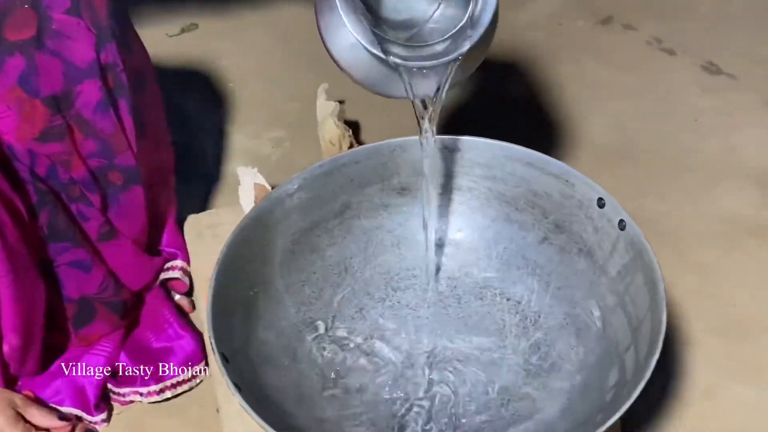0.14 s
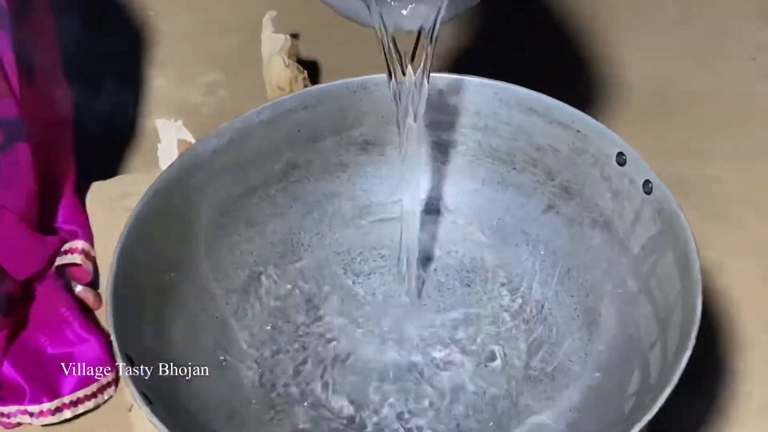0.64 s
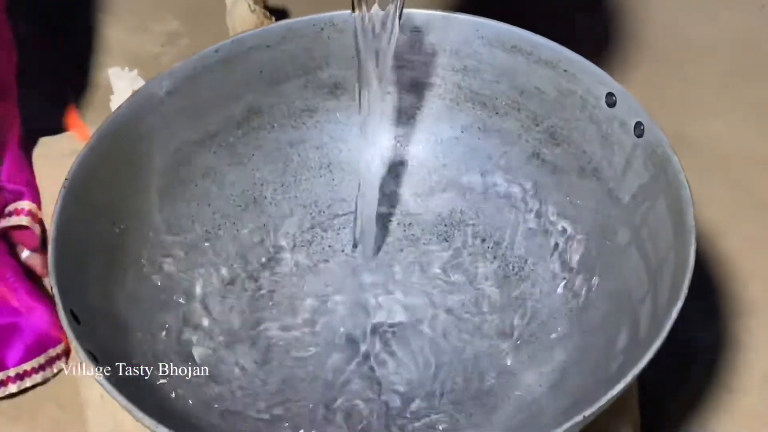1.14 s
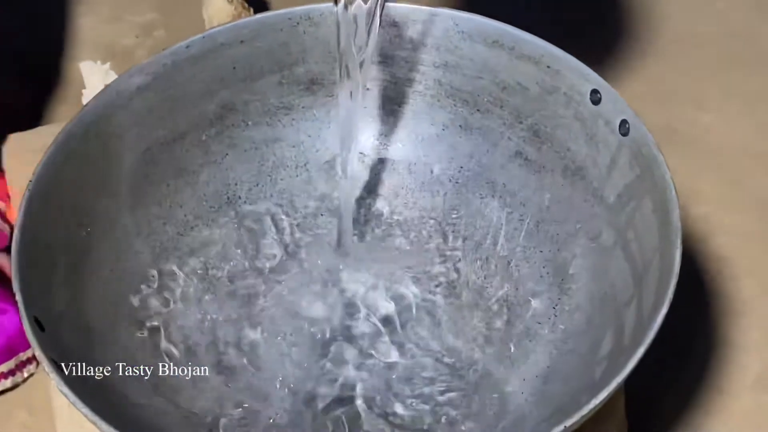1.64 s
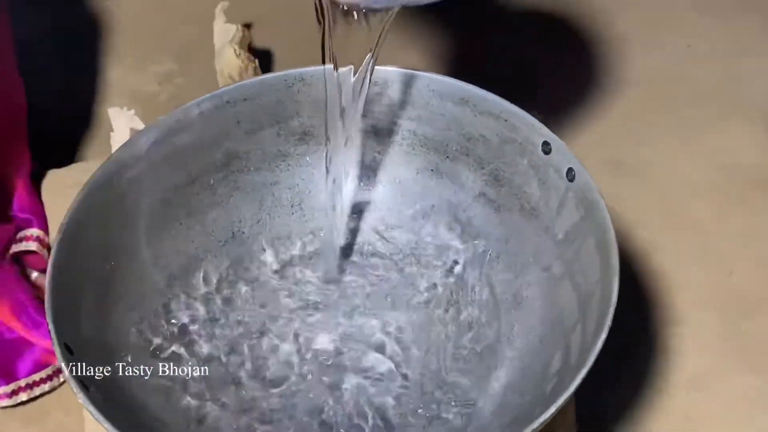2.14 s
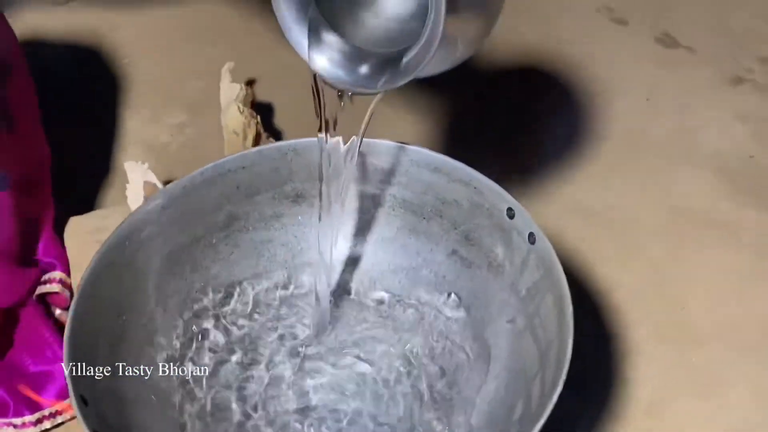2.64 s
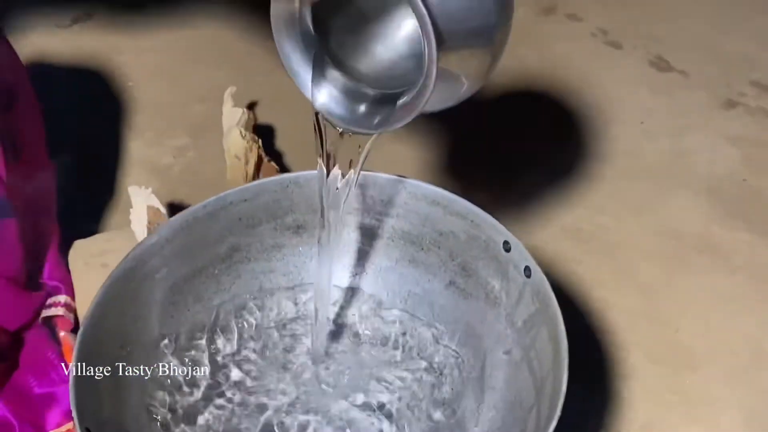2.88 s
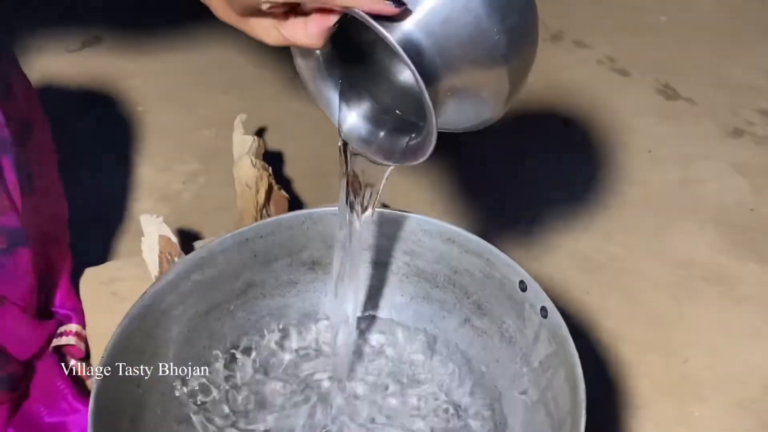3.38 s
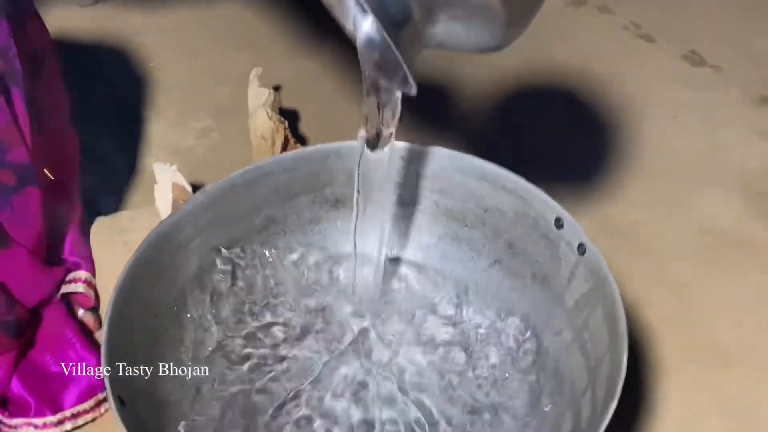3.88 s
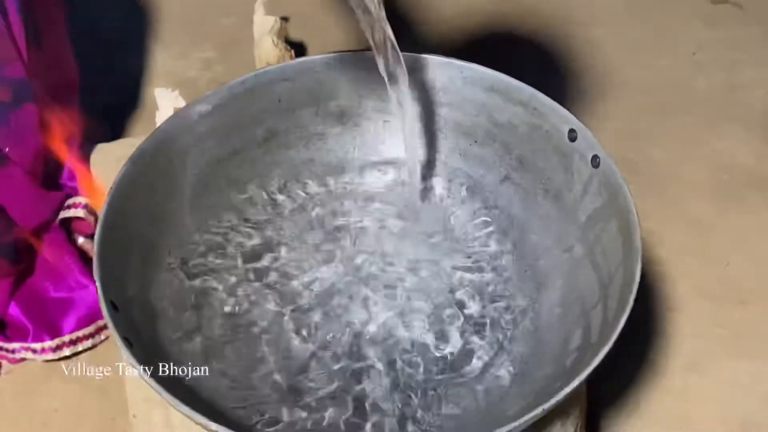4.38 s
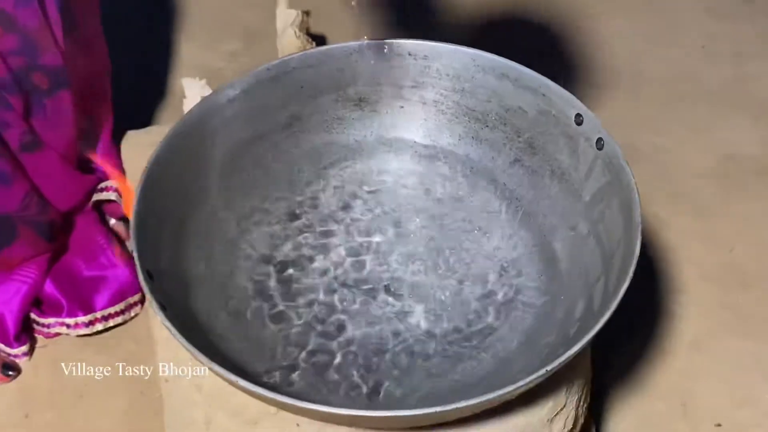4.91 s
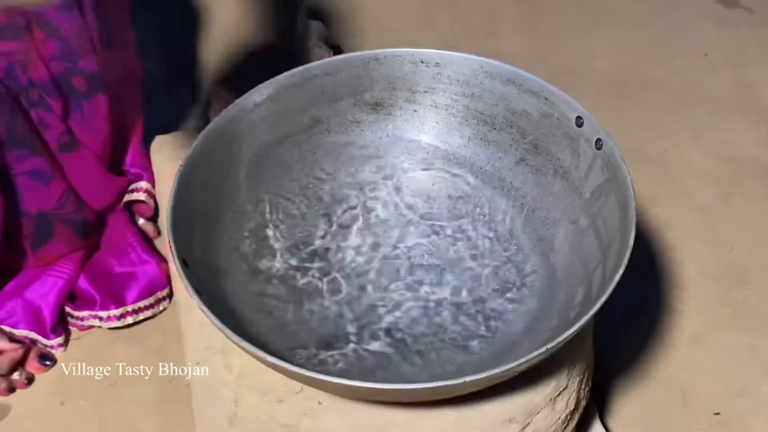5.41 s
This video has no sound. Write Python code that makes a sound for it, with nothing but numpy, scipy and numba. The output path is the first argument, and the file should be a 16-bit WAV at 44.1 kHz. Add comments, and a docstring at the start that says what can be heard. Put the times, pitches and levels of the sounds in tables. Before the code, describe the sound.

From the start, a thin stream of water is already falling into a wide metal pan, heard close with a phone-like stereo sound. It is a dense crowd of tiny bubbles: mid-pitched gurgle, finer bright fizz and ticking spray, touched by a brief metallic ring. Sharp plinks are frequent in the first second, some very high at 0.6-0.8 s, with rounder glugs sliding upward among them. From 1 to 1.6 s the flow is fuller and smoother; from about 1.7 to 3 s the spray eases and plinks are sparser. Bright plinks return from 3 s, with a fuller surge near 3.6 s. After 4 s the gurgle deepens, lowest near 4.9 s, amid a cluster of plinks and glugs. The pour stops around 5.1 s with a rising bloop, then two faint drips at 5.2 and 5.4 s. A soft fire rumble, faint airy hiss and distant, slowing engine hum remain throughout.

```python
"""A thin stream of water gurgles, plinks and fizzes as it falls from a small metal pot into a wide metal pan.
Every water sound is a crowd of bubbles: short tones that swell, slide up in pitch and die away.
Spray ticks over the stream, the pan rings on briefly, and a few clean drips end the pour.
Behind it, shaped noise makes the soft rumble of a fire, and low sine tones the hum of a far engine.
It is heard close by, as a phone would hear it, in two channels."""
import sys
import numpy as np
from scipy import signal
from scipy.fft import rfft, irfft, next_fast_len
from scipy.io import wavfile
from scipy.ndimage import uniform_filter1d
from numba import njit

SR = 44100
rng = np.random.default_rng(int(sys.argv[2]) if len(sys.argv) > 2 else 0)


def ratio(d):
    """dB to gain"""
    e = np.asarray(d, float) / 20
    return 10 ** e


def int16_out(signal):
    """Quantize to a 16-bit WAV file."""
    q = np.round(np.clip(np.atleast_2d(signal).T, -1, 1) * 32767)
    wavfile.write(sys.argv[1], SR, q.astype(np.int16))


N = 243431
TIME = np.arange(N) / SR


def on_log(hz, table):
    """Read a (frequency [Hz], value) table, with frequency on a log scale."""
    table_hz, value = np.transpose(table)
    return np.interp(np.log(np.maximum(hz, 1)), np.log(np.maximum(table_hz, 1)), value)


def shape(x, gain):
    """Filter a sound by a gain that depends on frequency."""
    size = next_fast_len(N + 4096)
    hz = np.arange(size // 2 + 1) * SR / size
    return irfft(rfft(x, size) * gain(hz), size)[..., :N]


def unit(x):
    """Scale to an rms of 1."""
    return x / np.sqrt(np.mean(x ** 2))


def walk(rate):
    """Wander at random: new values `rate` times a second, smoothed twice, with an rms of 1."""
    hold = int(SR / rate)
    steps = np.repeat(rng.standard_normal(N // hold + 1), hold)
    smooth = uniform_filter1d(uniform_filter1d(steps, hold), hold)
    return unit(smooth[:N])


@njit
def ring(n, start, size, hz, end_hz, length, rise, fall, bend):
    """Each bubble swells quickly and dies away while its pitch curls upward; start and length in samples."""
    out = np.zeros(n)
    for k in range(len(start)):
        phase, first = 0., int(start[k])
        for i in range(min(int(3 * length[k]) + 2, n - first)):
            u = i / length[k]
            pitch = hz[k] * (end_hz[k] / hz[k]) ** min(u, 1.0) ** bend
            phase += 2 * np.pi * pitch / SR
            swell = 1 - np.exp(-u / rise)
            decay = np.exp(-fall * u * u - u ** 6)
            out[first + i] += size[k] * swell * decay * np.sin(phase)
    return out


def swarm(count, pitch, cycles, scatter_db, glide, rise, clump_db):
    """Bubbles at random moments, most faint and a few loud, louder in clumps; rms 1.

    pitch(seconds, chance) gives each bubble's Hz and dB."""
    when, which, luck, ringing, slide = rng.random((count, 5)).T
    s = when * N / SR
    hz, db = pitch(s, which)
    db = db - scatter_db * np.log(1.02 - luck) + clump_db[(s * SR).astype(int)]
    length = cycles * (0.24 + 1.45 * ringing) * SR / hz
    return unit(ring(N, s * SR, ratio(db), hz, hz * (1 + glide * slide), length, rise, 1.0, 1.48))


def spread(table):
    """Make a pitch rule that spreads bubbles evenly in octaves over a table, with its levels."""
    def pitch(s, chance):
        low, high = table[0][0], table[-1][0]
        hz = low * (high / low) ** chance
        return hz, on_log(hz, table)
    return pitch


# tone of the fire and the open air, before scaling: (frequency [Hz], level per Hz [dB])
AIR_TONE = [(20, -38), (45, 3), (100, 3.5), (190, -5.5), (235, -14), (330, -16), (420, -18.5), (1000, -25),
            (2000, -30), (5000, -24.5), (10000, -28.5), (16000, -24.5)]


def air():
    """Low flutter of the fire over a faint open-air hiss: shaped noise that wavers in level."""
    noise = unit(shape(rng.standard_normal(N), lambda hz: ratio(on_log(hz, AIR_TONE))))
    return noise * ratio(-54 + walk(21))


# a distant engine slowing down: (time [s], firing rate [Hz], loudest multiple of that rate [number])
ENGINE_SPEED = [(0, 25, 6.9), (2.1, 24.95, 6.9), (2.9, 24.35, 6.2), (4.5, 24.05, 6.3), (4.6, 23.45, 8.4),
                (5.52, 23.1, 8.4)]


def engine():
    """Multiples of the firing rate, each wavering in level; distance leaves only the low ones."""
    s, hz, loudest = np.transpose(ENGINE_SPEED)
    turn = 2 * np.pi * np.cumsum(np.interp(TIME, s, hz)) / SR
    loudest_now = np.interp(TIME, s, loudest)
    hum = np.zeros(N)
    for k in range(4, 10):
        # 6 dB weaker for each multiple away from the loudest
        db = -58 - 6 * np.abs(k - loudest_now) + 2.34 * walk(3.05)
        hum += ratio(db) * np.sin(k * turn + 2 * np.pi * rng.random())
    return hum


def nearby(x, t60_s, db):
    """Two scatters of very short reflections off the pan wall, shifting as the surface moves."""
    out = np.zeros((2, N))
    lags_s = np.sort(rng.uniform(0.00098, .012, 10))
    for scatter, lag_s in zip(np.arange(10) % 2, lags_s):
        lag = SR * (lag_s + 0.000189 * walk(8))  # samples
        fade = np.exp(-np.log(1000) * lag_s / t60_s)
        out[scatter] += fade * np.interp(np.arange(N) - lag, np.arange(N), x)
    return ratio(db) * out


# what the pan favours: (frequency [Hz], width [Hz], boost [dB])
PAN_RESONANCES = [(1500, 360, 6.5), (3294, 126, 5), (3560, 73, 3), (7000, 590, 4)]


def pan(x):
    """The pan rings on briefly near its own resonances."""
    def gain(f):
        peaks = [1 + (ratio(db) - 1) / (1 + 2j * (f - hz) / width) for hz, width, db in PAN_RESONANCES]
        return np.prod(peaks, axis=0)
    return shape(x, gain)


# last drops into calm water:
# (time [s], level [dB], starting pitch [Hz], climb [octaves], ring length [ms])
LAST_DRIPS = [(5.084, -36, 750, 2.16, 51.4), (5.234, -50.5, 1700, .02, 19), (5.41, -56.5, 1500, .05, 14)]


def drips():
    """In calm water a bubble rings clean and dies away smoothly while it slides up."""
    s, db, hz, climb, ms = np.transpose(LAST_DRIPS)
    return ring(N, s * SR, ratio(db), hz, hz * 2 ** climb, ms * SR / 1000, 0.014, 1.57, 1.77)


# small bubbles, before the pan's boost: (time [s], level [dB], pitch [Hz])
SMALL_BUBBLES = [(0.133, -29.5, 2700), (0.156, -26, 3200), (0.173, -26.5, 3100), (0.223, -29, 5230),
                 (0.324, -25, 5200), (0.415, -24.5, 3200), (0.53, -24, 3450), (0.589, -30, 2770),
                 (0.6, -23, 11000), (0.667, -17, 11450), (0.703, -16.5, 12700), (0.776, -38, 3550),
                 (0.813, -26.5, 2750), (0.873, -21.5, 8060), (.955, -26.5, 7500), (1.181, -24, 7750),
                 (1.629, -22.5, 3340), (1.666, -33.5, 2130), (1.746, -30.5, 2900), (1.803, -34, 3160),
                 (1.966, -28.5, 2970), (2.073, -33, 3860), (2.092, -38.5, 3200), (2.39, -30, 5000),
                 (2.454, -28.5, 2350), (2.829, -28.5, 4100), (2.881, -33.5, 3320), (3.043, -30, 7550),
                 (3.091, -26.5, 5450), (3.194, -29.5, 5620), (3.224, -23.5, 9840), (3.321, -30.5, 5600),
                 (3.363, -23.5, 7950), (3.402, -20, 7100), (3.411, -18.5, 4400), (3.504, -24.5, 4640),
                 (3.625, -27, 4450), (3.708, -26, 4500), (3.788, -18, 8870), (3.87, -30.5, 4180),
                 (4.123, -28.5, 3840), (4.207, -27.5, 7090), (4.364, -26.5, 3720), (4.617, -25, 5430),
                 (4.645, -20.5, 5230), (4.702, -30, 2230), (4.767, -25, 2480), (4.793, -20, 3750),
                 (4.836, -22.5, 3760), (4.872, -30, 2960), (4.925, -20.5, 3570), (4.94, -26.5, 2580),
                 (4.958, -19, 3220), (4.97, -48, 2330), (5.012, -28.5, 2400), (5.049, -23.5, 5180)]


def plinks():
    """Small bright bubbles, each with the slap of its drop and a few fainter droplets after it."""
    s, db, hz = np.transpose(SMALL_BUBBLES)
    late, size, weak, last = rng.random((len(s), 5, 4)).T
    late[0], size[0], weak[0] = 0, .5, 0  # the first of each group is the drop itself
    pitch = hz * 2 ** (1.11 * (size - .5))
    level = db - np.where(late > 0, 13.0 + 9 * weak, 0)
    # higher bubbles ring shorter: about 3.3 ms at 3500 Hz
    length = SR * 0.0033 * (3500 / pitch) * (0.54 + 0.78 * last)
    start = (s - .001 + .022 * late) * SR
    tone = ring(N, start.ravel(), ratio(level).ravel(), pitch.ravel(), 1.06 * pitch.ravel(),
                length.ravel(), 0.28, 2.72, 1.0)
    # the slap is a brief puff of bright noise
    landings = np.zeros(N)
    landings[((s - .001) * SR).astype(int)] = ratio(db - 14.5)
    puff = np.exp(-((np.arange(300) / SR - .002) / 0.0014) ** 2)
    slap = np.convolve(landings, puff)[:N]
    return tone + slap * shape(rng.standard_normal(N), lambda f: f / (f + 2500))


# large bubbles, before their flutter: (time [s], level [dB], starting pitch [Hz], climb [octaves])
LARGE_BUBBLES = [(0.023, -44, 1360, 0.17), (0.155, -48.5, 730, 0.87), (0.17, -40, 1374, 0.42),
                 (0.219, -43.5, 1200, 0.26), (0.265, -46, 830, 0.23), (0.307, -37, 543, 0.7),
                 (0.415, -42.5, 1186, 0.49), (0.526, -39.5, 1480, 0.14), (0.551, -41.5, 1320, 0.089),
                 (0.627, -47, 833, 0.5), (0.666, -38, 608, 0.37), (0.687, -42.5, 1500, 0.41),
                 (0.72, -47, 1043, 0.47), (0.852, -47, 574, 0.84), (0.978, -42, 913, 0.037),
                 (1.54, -36, 1100, 0.018), (1.624, -39, 1066, 0.06), (1.768, -36, 1300, 0.041),
                 (1.778, -40.5, 573, 0.22), (1.81, -44, 728, 0.73), (1.999, -39.5, 1443, 0.13),
                 (2.344, -44.5, 1150, 0.44), (2.447, -35, 1450, 0.088), (2.554, -41, 1500, 0.18),
                 (2.593, -35, 1420, 0.043), (2.96, -47, 1080, 0.12), (3.076, -49.5, 980, 0.36),
                 (3.439, -42, 944, 0.14), (3.473, -40, 900, 0.23), (3.605, -40, 893, 0.47),
                 (3.708, -37, 1080, 0.17), (4.016, -41.5, 1440, 0.16), (4.803, -42, 693, 0.3),
                 (4.802, -44.5, 368, .02), (4.856, -45, 540, 0.33), (4.878, -39, 866, 0.28),
                 (4.877, -42, 466, 0.29), (4.935, -47, 560, 0.54), (5.002, -29.5, 775, 0.15),
                 (5.009, -43, 980, 0.26)]


def glugs():
    """Large bubbles ring long and slide up as they reach the surface, fluttering in churned water.

    Smaller bubbles sound among them."""
    s, db, hz, climb = np.transpose(LARGE_BUBBLES)
    # a lower bubble rings longer, and so does one that climbs further, up to an octave
    ms = 6.5 * 1000 / hz + 31 * np.clip(climb, 0, 1)
    large = ring(N, s * SR, ratio(db), hz, hz * 2 ** climb, ms * SR / 1000, 0.04, 1.9, 1.41)
    large = large * ratio(2.5 * walk(150))
    # six smaller bubbles follow each large one
    late, size, weak = rng.random((len(s), 6, 3)).T
    pitch = (hz * 2 ** (1.59 * size)).ravel()
    start = (s + 0.032 * late ** 2).ravel() * SR
    level = (db - 1.5 - 24.0 * weak).ravel()
    smaller = ring(N, start, ratio(level), pitch, 1.25 * pitch, 7.0 * SR / pitch, 0.09, 1.4, 0.94)
    return large + smaller


# the flow, given as the level of the fizz before the pan's boost, and the air pocket under the stream:
# (time [s], fizz level [dB], pocket pitch [Hz])
POUR_COURSE = [(0, -54, 1350), (.08, -57.5, 1186), (.25, -49.5, 945), (.46, -56, 1037), (.6, -52.5, 1160),
               (0.721, -53, 1025), (0.799, -49, 2220), (0.869, -49.5, 938), (1.4, -48.5, 980),
               (1.609, -51.5, 910), (1.68, -49.5, 1890), (1.77, -53, 880), (1.97, -51, 1230),
               (2.25, -56, 1790), (2.5, -51.5, 1226), (2.9, -57, 1306), (3.06, -53, 865),
               (3.2, -55.5, 1210), (3.38, -55, 947), (3.6, -45, 889), (3.76, -52, 990), (3.95, -50, 760),
               (4.15, -49.5, 702), (4.26, -57, 810), (4.358, -52.5, 587), (4.52, -54, 750), (4.7, -48, 545),
               (4.879, -51, 428), (5.028, -57.5, 717), (5.15, -72, 890)]
# spray before the pan's boost: (time [s], level [dB])
SPRAY_COURSE = [(0, -57.5), (.7, -56.5), (1.3, -54.5), (1.7, -65), (2.5, -68), (3.1, -58.5), (4.9, -56.5),
                (5.07, -63.5), (5.16, -62.5)]
# size mix of the fizz bubbles, before scaling: (pitch [Hz], level [dB])
FIZZ_SIZES = [(1300, -12.5), (1900, -1), (3000, 5.5), (5000, 8.5), (7000, 0), (9000, 14.5)]
# size mix of the spray, before scaling: (pitch [Hz], level [dB])
SPRAY_SIZES = [(5000, -3.5), (8000, -2), (12000, 3), (15500, -6)]


def stream():
    """Gurgle, fizz and spray of the falling water: three swarms of bubbles that follow the flow."""
    s, fizz_db, pocket_hz = np.transpose(POUR_COURSE)
    # a larger, lower pocket gurgles louder: 5 dB per octave down
    gurgle_db = fizz_db - 6.5 - 5 * np.log2(pocket_hz / 1000)

    def pocket(t, chance):
        # the pocket sets the largest and most frequent bubbles; smaller ones are rarer
        octaves = 2.473 * chance ** 1.803 - .08
        return np.interp(t, s, pocket_hz) * 2 ** octaves, -2.5 * np.abs(octaves)

    def small(t, chance):
        # hardly any bubble is larger than the pocket
        hz, db = spread(FIZZ_SIZES)(t, chance)
        return hz, db - 40 * np.maximum(np.log2(np.interp(t, s, pocket_hz) / hz), 0)

    # the stream breaks into lumps: each landing lifts all sizes together
    lumps, spatter = 2.11 * np.tanh(walk(50)), walk(130)
    # a full stream lands smoothly, a thin one in separate lumps
    fizz_now_db = np.interp(TIME, s, fizz_db)
    lumps = lumps * np.clip((-45.0 - fizz_now_db) / 7, .3, 1.1)
    gurgle = swarm(count=6500, pitch=pocket, cycles=8.94, scatter_db=5.0, glide=0.29, rise=0.08,
                   clump_db=3.0 * lumps)
    fizz = swarm(count=26000, pitch=small, cycles=11.8, scatter_db=4.5, glide=0.27, rise=0.083,
                 clump_db=1.55 * lumps + 2.6 * spatter)
    spray = swarm(count=20000, pitch=spread(SPRAY_SIZES), cycles=7.9, scatter_db=8.5, glide=0.21, rise=0.42,
                  clump_db=2.54 * lumps + 2.6 * spatter)
    water = ratio(np.interp(TIME, s, gurgle_db)) * gurgle + ratio(fizz_now_db) * fizz
    return water + ratio(np.interp(TIME, *np.transpose(SPRAY_COURSE))) * spray


# how much of the unrelated sound differs between the channels: (frequency [Hz], share [dB])
UNRELATED_SHARE = [(50, -16), (300, -8.5), (1400, -3), (2300, -24.5), (6000, -13.5)]


def scene():
    """All sources, with a part that both channels share and a part that differs between them."""
    water = pan(stream() + plinks()) + glugs()
    shared, loose = nearby(water, t60_s=0.071, db=-13)
    centre = water + shared + drips() + air() + engine()
    loose = shape(loose * ratio(4.5) + air(), lambda hz: ratio(on_log(hz, UNRELATED_SHARE)))
    return centre + loose * np.array([[1], [-1]])


# level between the two channels: (frequency [Hz], left minus right [dB])
CHANNEL_LEVEL = [(150, 0), (300, .5), (700, 2.5), (1290, 4), (2300, 0)]
# phase between the two channels: (frequency [Hz], lead of the left [half turns])
CHANNEL_PHASE = [(0, 0), (1120, .16), (1460, .32), (2150, 0), (7490, 0), (8530, -.92), (9560, -1.08),
                 (10400, -1.9), (11600, -2.05), (12600, -2.9), (13700, -3.05), (14600, -3.9),
                 (16000, -4.05)]


def two_channels(dry):
    """The two channels differ in level and in phase; their sum has gaps in the treble."""
    sides = np.array([[.5], [-.5]])  # each channel takes half of the difference
    phase_hz, lead = np.transpose(CHANNEL_PHASE)

    def gain(hz):
        level = ratio(sides * on_log(hz, CHANNEL_LEVEL))
        return level * np.exp(1j * np.pi * sides * np.interp(hz, phase_hz, lead))
    return shape(dry, gain)


def band_limit(x):
    """A steep low-pass at the top of the band."""
    return signal.sosfilt(signal.butter(12, 16980, fs=SR, output="sos"), x)


def record(dry):
    """The scene in two channels, with everything above about 15850 Hz cut steeply."""
    mix = shape(two_channels(dry), lambda hz: 1 / (1 + (hz / 15850) ** 160))
    return band_limit(mix)


dry = scene()
out = record(dry)
int16_out(out)
```